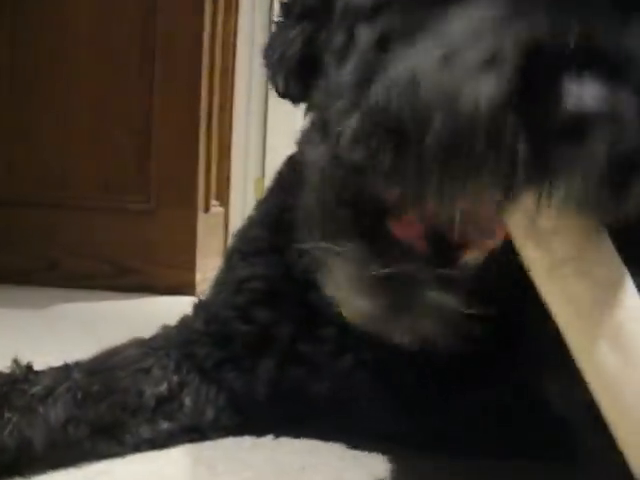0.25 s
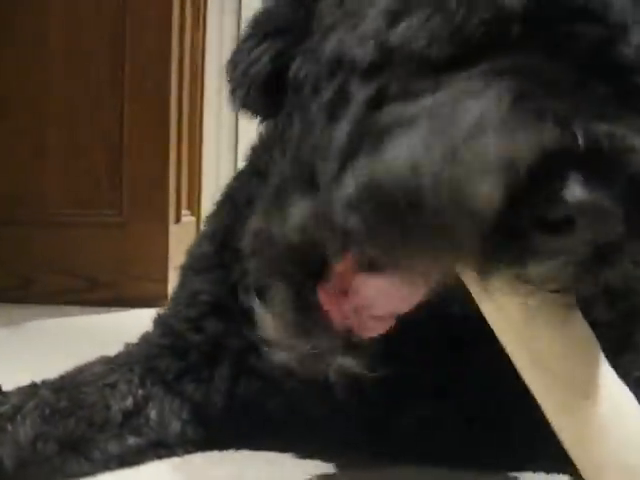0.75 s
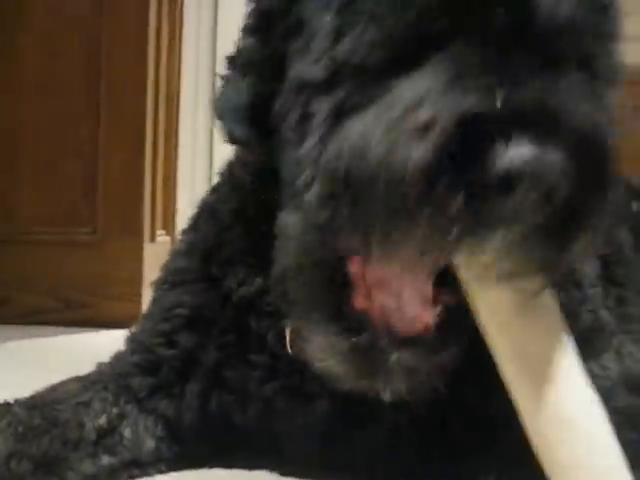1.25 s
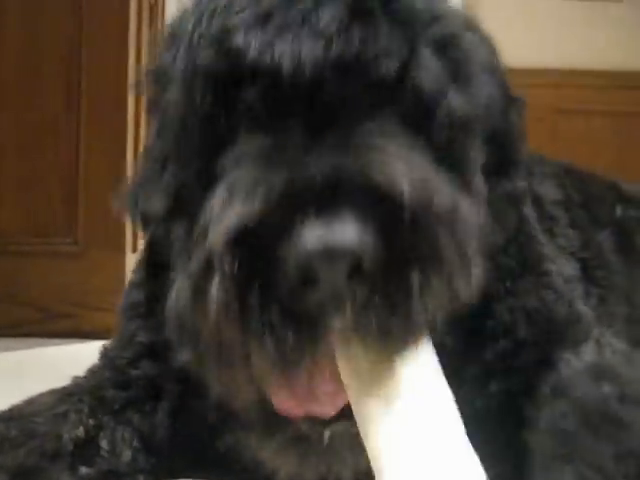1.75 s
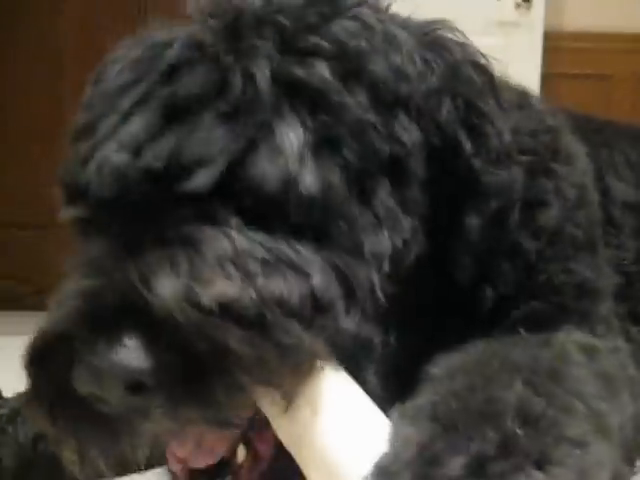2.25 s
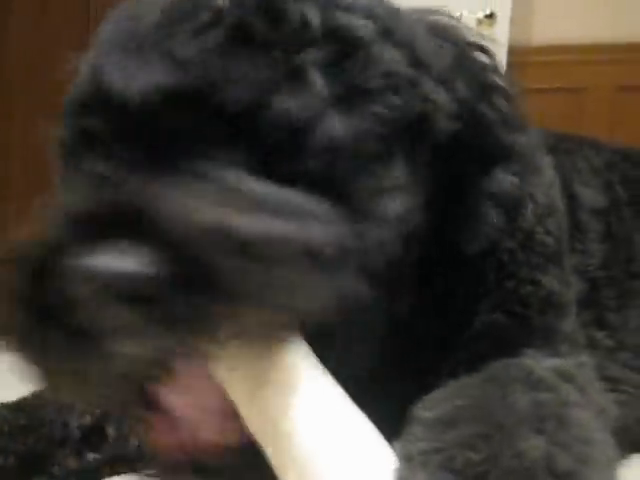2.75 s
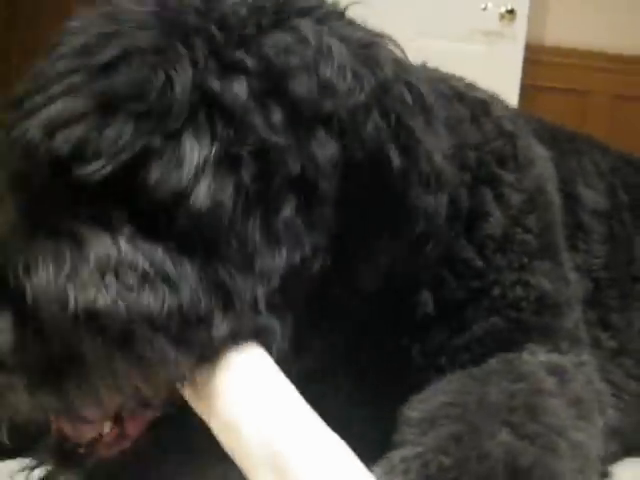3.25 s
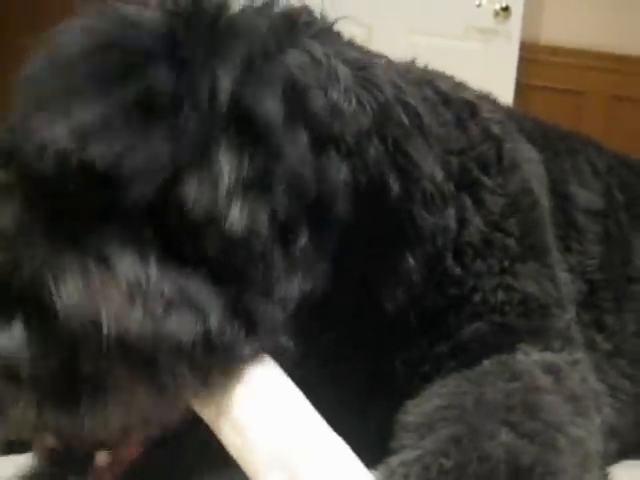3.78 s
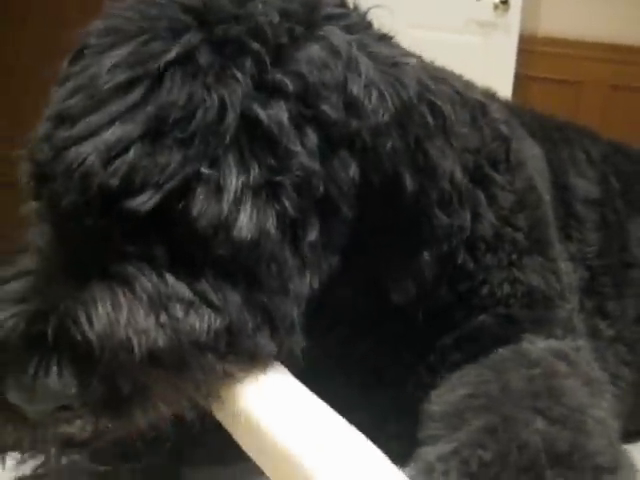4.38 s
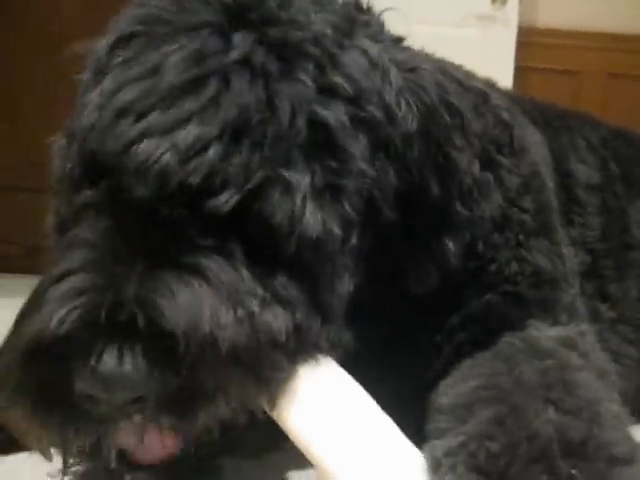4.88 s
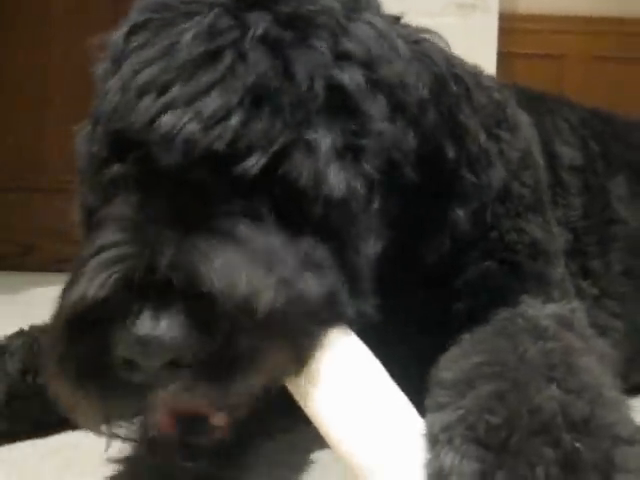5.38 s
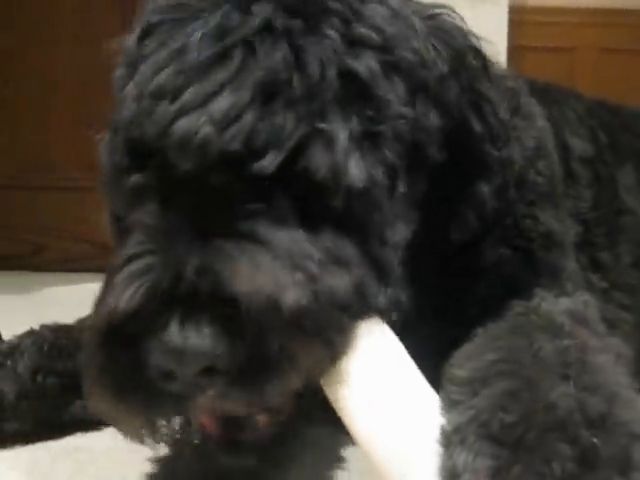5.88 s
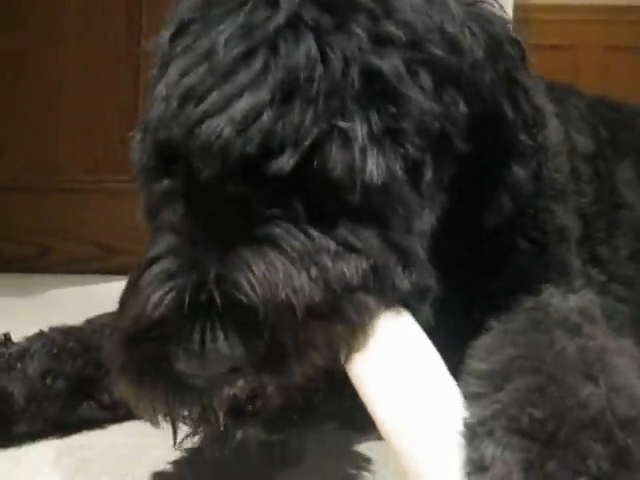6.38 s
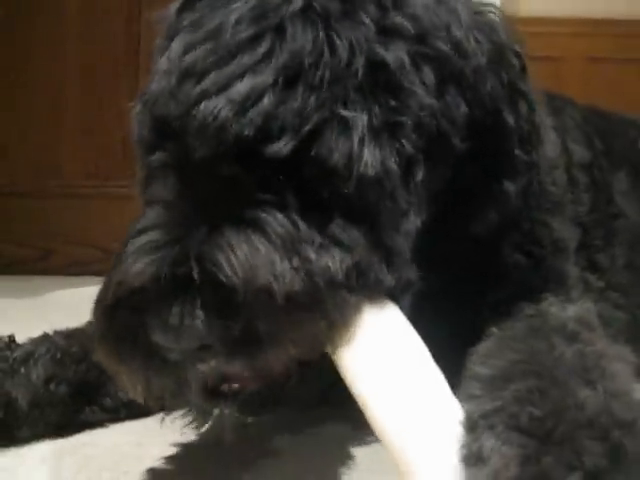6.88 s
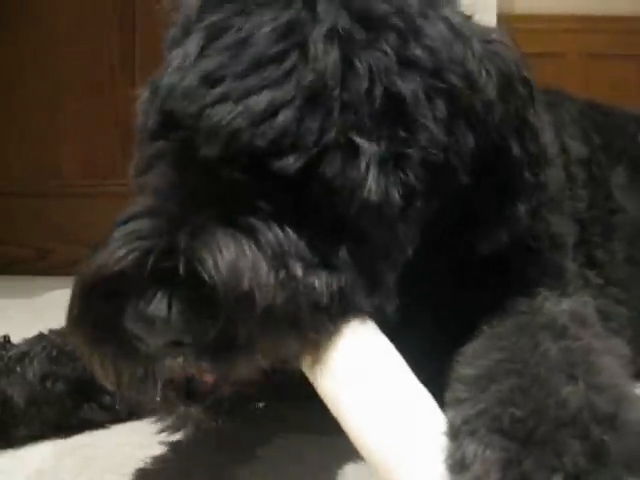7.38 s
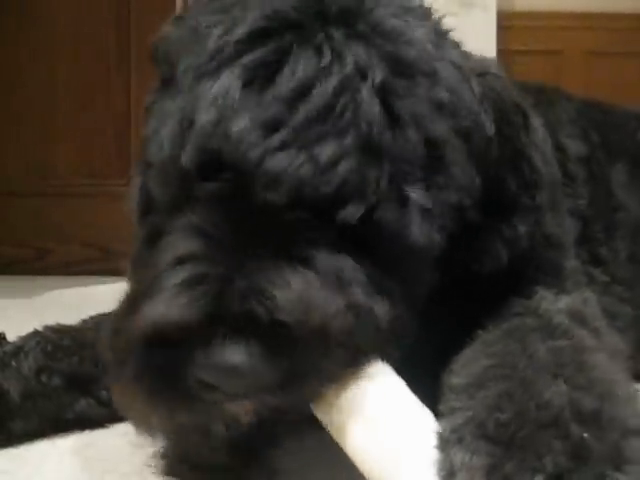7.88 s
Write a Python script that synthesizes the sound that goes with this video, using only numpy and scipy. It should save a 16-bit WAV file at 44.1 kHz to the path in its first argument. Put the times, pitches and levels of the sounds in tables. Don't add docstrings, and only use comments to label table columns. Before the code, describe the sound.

Close, dull-sounding tooth cracks and rasping bites on a hollow bone, loudest around two seconds, then sparser clicks, knocks and floor thumps.

```python
import sys
import numpy as np
from scipy import signal
from scipy.fft import rfft, irfft, next_fast_len
from scipy.io import wavfile
from scipy.ndimage import map_coordinates

SR = 44100
rng = np.random.default_rng(int(sys.argv[2]) if len(sys.argv) > 2 else 0)


def ratio(d):
    e = np.asarray(d, float) / 20
    return 10 ** e


def output_pcm(signal):
    pcm = np.clip(np.atleast_2d(signal).T, -1, 1) * 32767
    wavfile.write(sys.argv[1], SR, np.round(pcm).astype(np.int16))


N = 358974


def unit(x):
    return x / np.sqrt(np.mean(x ** 2) + 1e-20)


def wobble(rate):
    knots = rng.standard_normal(int(N * rate / SR) + 4)
    return map_coordinates(knots, [np.arange(N) * rate / SR])


def coloured(x, spectrum):
    m = next_fast_len(N + 8192)
    hz, db = np.transpose(spectrum)
    log_hz = np.log(np.fft.rfftfreq(m, 1 / SR) + 1)
    gain = ratio(np.interp(log_hz, np.log(hz + 1), db))
    return irfft(rfft(x, m) * gain, m)[:N]


def rung(push, hz, width_hz, order=1):
    f = np.fft.rfftfreq(push.shape[1], 1 / SR)
    damping = 1j * f * width_hz
    response = damping / (hz[:, None] ** 2 - f * f + damping)
    ring = irfft(rfft(push) * response ** order, push.shape[1])
    return ring / np.abs(ring).max(axis=1, keepdims=True)


def placed(start_s, rows):
    at = np.round(start_s * SR).astype(int)[:, None] + np.arange(rows.shape[1])
    return np.bincount(at.ravel(), rows.ravel(), N + SR)[:N]


def room():
    # hz, density_db (dB per Hz)
    hiss_spectrum = [(15, -25), (25, 9.5), (235, -3.5), (286, -7), (1410, -13.5), (2300, -16.5),
                     (4380, -20), (6500, -43)]
    # pitch_hz, level_db
    hum_tone = [(242.2, -46.5)]
    (hz, db), = hum_tone
    turns = np.cumsum(hz + 5 * wobble(25)) / SR
    hum = ratio(db - 4 + 3.5 * wobble(15)) * np.sin(2 * np.pi * turns)
    hiss = unit(coloured(rng.standard_normal(N), hiss_spectrum[:-1]))
    return ratio(-43 + 0.88 * wobble(4.7)) * hiss + hum


def swells(peak_s, build_s, release_s, db, swing_db, rest_db):
    t = np.arange(0, N + 64, 64) / SR - peak_s[:, None]
    away = np.maximum(-t / np.abs(build_s)[:, None], t / np.abs(release_s)[:, None])
    strokes = ratio(2 * (db[:, None] - swing_db * away))
    power = strokes.sum(axis=0) + ratio(2 * rest_db)
    return np.interp(np.arange(N) / 64, np.arange(len(power)), 10 * np.log10(power))


def pressure():
    # peak_s, build_s, release_s, scrape_db, depth_db
    bites = [(0, .1, 0.38, -27.5, -19), (.22, 0.39, 0.14, -31, 4), (.5, 0.24, 0.069, -39, -19),
             (.652, .04, .2, -31.5, 1), (0.865, 0.13, 0.049, -32.5, -3.5), (1.148, 0.38, 0.029, -41.5, -10),
             (1.351, 0.17, 0.098, -38, 5.5), (1.691, 0.13, 0.047, -32, 8.5), (1.865, 0.11, 0.044, -32.5, 6),
             (2.046, 0.097, 0.2, -32, -3), (2.291, 0.12, 0.27, -31.5, -20), (2.47, 0.039, 0.17, -27, -17.5),
             (2.833, 0.0077, 0.14, -36.5, -2.5), (3.137, 0.16, .2, -40, -14),
             (3.454, 0.031, 0.084, -32.5, -7), (3.879, 0.12, 0.28, -39.5, -9.5),
             (4.192, 0.043, 0.13, -41, 7), (4.433, 0.12, .02, -33, -6), (5.199, 0.26, .05, -37, 2),
             (5.442, 0.063, 0.27, -41, 1.5), (5.926, 0.1, 0.22, -37, -4), (6.792, 0.23, 0.018, -33.5, -24),
             (7.238, 0.11, 0.056, -49.5, 18.5), (7.58, 0.11, 0.089, -40.5, -3)]
    # peak_s, half_length_s, scrape_db, depth_db
    nips = [(0.295, 0.032, -40, 4), (1.705, 0.02, -36, 6), (2.12, 0.0092, -20.5, -7),
            (2.16, 0.018, -18.5, -6.5), (3.215, 0.023, -36, -11), (3.799, 0.046, -36.5, -2.5),
            (3.229, 0.036, -36, -17.5), (3.316, 0.03, -34.5, 5), (4.716, 0.013, -32, 5.5),
            (4.804, 0.03, -35.5, 5), (4.876, 0.062, -59, 17.5), (4.958, 0.061, -60, 16),
            (5.612, .05, -33, 1), (5.738, 0.041, -31.5, 6.5), (6.12, 0.11, -33.5, -2.5),
            (6.258, .07, -31.5, -5.5), (6.444, 0.34, -46, 1), (6.59, 0.25, -45, -18),
            (6.857, 0.13, -47.5, -24), (7.16, 0.14, -44.5, -15), (5.753, .012, -27, 3),
            (5.705, .012, -36, 3), (5.785, .025, -38, 6), (5.642, .005, -30, 5), (4.1635, .003, -24, -8),
            (3.252, .01, -30, 0), (3.306, .008, -28, -3), (1.635, .012, -36, 8), (7.216, .005, -30, 3),
            (0.539, .003, -26, -5), (7.674, 0.014, -34, 10), (7.974, 0.011, -36, 10),
            (8.043, 0.033, -38, 6.5), (8.091, .12, -41, 2.5)]
    # peak_s, half_length_s, rumble_db
    shuffles = [(0.557, 0.2, -40), (0.804, 0.055, -28.5), (0.973, 0.12, -37.5), (1.371, 0.068, -29),
                (1.796, 0.069, -31), (2.052, 0.067, -31.5), (2.31, 0.09, -34), (3.19, 0.26, -36),
                (4.776, 0.13, -37.5), (5.2, 0.1, -32.5), (5.435, 0.11, -48.5), (5.773, 0.018, -25.5),
                (5.957, 0.36, -34.5), (6.135, 0.07, -38), (6.64, 0.32, -43.5), (7.275, 0.046, -32),
                (7.58, 0.088, -39.5), (7.705, 0.041, -33.5), (7.985, 0.044, -34)]
    swing_db, deep_swings = 14.5, 1.2
    floor_share_db = -4

    even_nips = [(s, half, half, db, depth) for s, half, db, depth in nips]
    s, build, release, db, depth_db = np.transpose(bites + even_nips)
    fine_db = swells(s, build, release, db, swing_db, rest_db=-49)
    coarse_db = swells(s, build, release, db + depth_db, deep_swings * swing_db, rest_db=-55)
    s, half, db = np.transpose(shuffles)
    shuffle_db = swells(s, half, half, db, swing_db, rest_db=-53)
    rumble_power = ratio(2 * shuffle_db) + ratio(2 * (coarse_db + floor_share_db))
    return fine_db, coarse_db, 10 * np.log10(rumble_power)


def grit(share, spread_db, smooth):
    size = ratio(spread_db * np.minimum(rng.exponential(size=N), 4))
    happens = rng.random(N) < share * ratio(6 * wobble(120))
    slips = happens * rng.standard_normal(N) * size
    return unit(slips) + smooth * rng.standard_normal(N)


def crumbs(count, centre_hz, octaves, life, spread_db):
    at = rng.integers(N, size=count)
    hz = centre_hz[at, None] * 2 ** (octaves * rng.standard_normal((count, 1)))
    cycles = hz * np.arange(512) / SR
    envelope = np.exp(-cycles / life) * (1 - np.exp(-cycles / .5))
    rows = np.sin(2 * np.pi * cycles) * envelope
    size_db = spread_db * np.minimum(rng.exponential(size=(count, 1)), 3)
    return unit(placed(at / SR, rows * ratio(size_db)))


def grinding():
    # hz, density_db (dB per Hz)
    fine_spectrum = [(1500, -4.5), (2500, -4), (3300, -2), (4500, -2.5), (7000, -11)]
    # hz, density_db (dB per Hz)
    rumble_spectrum = [(20, -18.5), (80, -3), (150, -1), (300, -5.5), (600, -14), (1500, -51.5),
                       (7000, -84)]
    # time_s, resonance_hz
    mouth_path = [(0, 1650), (0.549, 1352), (.7, 1680), (1.301, 1412), (1.751, 1826), (2.298, 2035),
                  (2.901, 1216), (3.451, 1140), (3.88, 1410), (4.298, 965), (4.749, 1127), (4.9, 740),
                  (5.602, 1116), (5.801, 876), (6.3, 1225), (6.898, 1345), (7.301, 779), (8.14, 1160)]

    fine_db, coarse_db, rumble_db = pressure()
    mouth_hz = np.interp(np.arange(N) / SR, *np.transpose(mouth_path))
    flutter = wobble(70) / (1 + 40 * ratio(fine_db))

    slips = grit(.04, spread_db=1.8, smooth=.5 + 14 * ratio(fine_db))
    fine = unit(coloured(slips, fine_spectrum))
    fine = fine + .5 * crumbs(count=2500, centre_hz=0 * mouth_hz + 3500, octaves=0.42, life=0.98, spread_db=-0.5)
    fine = unit(ratio(2.42 * flutter) * fine)

    rubbing = crumbs(count=7000, centre_hz=mouth_hz, octaves=0.592, life=0.87, spread_db=0.0)
    ringing = crumbs(count=2500, centre_hz=mouth_hz, octaves=0.28, life=4, spread_db=2.5)
    coarse = unit(ratio(4.1 * flutter + 0.5 * wobble(30)) * (1.4 * rubbing + ringing))

    rumble = unit(ratio(3.1 * wobble(30)) * coloured(rng.standard_normal(N), rumble_spectrum))
    return ratio(fine_db - 0.75) * fine + ratio(coarse_db - 3.43) * coarse + ratio(rumble_db) * rumble


def contacts():
    # start_s, tooth_peak_db, tooth_ring_hz, bone_peak_db, bone_ring_hz
    crack_events = [(0.5405, 1, 3430, -6, 1040), (0.6139, -11.5, 2920, -12, 1980),
                    (1.6841, -8.5, 3340, -13, 1680), (2.1168, -10, 3180, -24, 1710),
                    (2.1419, 1, 3170, -7.5, 2060), (2.147, -5.5, 3400, -16.5, 2070),
                    (2.1558, 0.5, 3420, -11, 2070), (2.2168, -5.5, 3920, -13, 1870),
                    (2.3011, 3, 3680, -15, 2480), (2.4708, -9, 3600, -21.5, 757),
                    (2.475, 5.5, 3440, -10, 1460), (2.5108, 2, 3210, -11, 2180),
                    (3.128, -13, 4000, -14.5, 1165), (3.3054, -19, 3770, -15.5, 1000),
                    (3.3123, -10, 3600, -19, 444), (3.5995, -7, 3090, -11, 1640),
                    (3.8586, -5.5, 3050, -8.5, 1544), (4.165, -2, 3090, -6, 1515),
                    (4.8395, -18.5, 2900, -12.5, 650), (5.6446, -17.5, 4320, -11.5, 830),
                    (5.735, -12, 3450, -9, 1340), (6.042, -7, 2860, -11.5, 1520),
                    (7.1207, -14, 3130, -16, 1760), (7.2191, -6.5, 2500, -6, 755)]
    # start_s, peak_db, tooth_ring_hz
    tick_events = [(0.7007, -18, 4000), (0.745, -14.5, 4850), (0.7829, -13.5, 5130), (0.832, -15.5, 5300),
                   (1.526, -14.5, 5100), (1.5822, -22, 4580), (1.78, -11, 2600), (1.8645, -14, 2890),
                   (1.9837, -19, 2870), (2.037, -19, 4550), (2.1995, -13, 4800), (2.254, -14, 3100),
                   (2.311, -2, 3800), (2.348, -13, 3120), (2.4283, -13, 2950), (2.4358, -10.5, 3650),
                   (2.784, -17.5, 4500), (2.8462, -13, 4030), (3.0453, -19, 4120), (3.2489, -9, 3140),
                   (4.367, -21, 4870), (4.689, -21, 4900), (4.7136, -19, 3100), (5.1864, -20, 2930),
                   (5.6056, -19.5, 4280), (6.0966, -17, 3050), (6.246, -13.5, 3370), (6.4763, -16, 3230),
                   (6.584, -17.5, 5460), (6.719, -16, 4860)]
    # start_s, peak_db, tooth_ring_hz
    nibble_events = [(0.713, -23, 4930), (0.8658, -25, 3150), (1.282, -21.5, 4170), (1.334, -21, 2830),
                     (2.008, -15, 3100), (2.439, -21, 3750), (3.102, -19.5, 3070), (3.282, -28, 3530),
                     (3.4744, -22, 4260), (3.609, -19, 4400), (3.874, -24.5, 2900), (4.35, -18, 3360),
                     (5.4187, -23, 3030), (5.618, -20.5, 4300), (5.847, -25, 4650), (6.2162, -21, 4350),
                     (6.271, -20, 3500), (6.277, -17.5, 3550), (6.327, -20, 3850), (6.776, -23.5, 4020),
                     (6.7823, -22, 3630), (6.7923, -17, 3250), (6.9761, -23, 5070), (7.052, -22, 3300),
                     (7.082, -26, 4700), (7.34, -32, 3850), (7.113, -25, 3000), (7.318, -28, 3720),
                     (7.435, -30.5, 3460), (7.48, -23, 3460), (7.5035, -23.5, 2780), (7.542, -23, 2530),
                     (4.222, -23, 3270),
                     (0.1806, -16, 3700), (0.2117, -14.5, 3100), (0.296, -26, 3920), (0.4212, -24, 4180),
                   (0.6539, -22, 2520), (1.1195, -27, 4200), (1.2023, -26, 5030), (1.4097, -30, 2780),
                   (1.615, -31, 4760), (1.6948, -23, 2890), (1.717, -30, 2860), (1.8242, -23, 2520),
                   (1.9456, -35, 4290), (2.2848, -21, 3940), (2.2901, -22, 4130), (2.3793, -19, 3400),
                   (2.432, -15, 2910), (2.448, -30, 3120), (2.4652, -22.5, 3140), (2.6476, -27, 4050),
                   (3.0082, -33.5, 3510), (3.063, -24, 4440), (3.1423, -26, 3520), (3.3463, -36, 4600),
                   (3.381, -27.5, 4250), (3.662, -36, 4100), (3.73, -31, 3390), (3.7738, -32, 3400),
                   (3.9976, -30.5, 3940), (4.0183, -29, 4260), (4.2685, -37, 4800), (4.4215, -19.5, 5430),
                   (4.4296, -19, 4720), (4.5, -27, 3750), (4.6171, -29.5, 4200), (4.9493, -37, 3380),
                   (5.0027, -32.5, 4690), (5.0768, -23, 4550), (5.111, -28, 3700), (5.1262, -27.5, 3480),
                   (5.156, -25, 3040), (5.1924, -16.5, 2860), (5.4743, -28.5, 2820), (5.6005, -17, 3730),
                   (5.7035, -29, 3380), (5.874, -35, 3920), (5.898, -26, 3510), (6.0068, -26, 4690),
                   (6.083, -23, 4670), (6.5003, -24, 3360), (6.862, -29, 4310), (6.9432, -28, 4600),
                   (7.4568, -33.5, 4720), (7.6333, -32.5, 3120), (7.7334, -31, 4600), (7.7831, -27, 4600),
                   (7.916, -28, 4350), (7.9586, -30, 3080)]
    # start_s, peak_db, bone_ring_hz
    knock_events = [(0.2875, -19, 1600), (0.557, -21.5, 1070), (1.3682, -14.5, 1420), (1.3826, -20.5, 1510),
                    (1.6276, -10.5, 1430), (1.708, -21, 2050), (1.762, -22, 1690), (1.842, -19, 2000),
                    (1.8707, -16, 1830), (2.0704, -17.5, 960), (2.3194, -28, 670), (2.8353, -11, 1950),
                    (3.1968, -18.5, 790), (3.251, -16, 410), (3.789, -34, 660), (4.3986, -15, 626),
                    (4.779, -15.5, 1190), (5.036, -25, 1490), (5.2381, -22.5, 1600), (5.6676, -8, 1240),
                    (5.751, -9, 620), (7.115, -23, 1820), (7.265, -25, 940), (7.665, -10.5, 740),
                    (7.9856, -20.5, 780), (0.541, -10.5, 2040), (2.3023, -7.5, 1900), (3.858, -12, 1080),
                    (4.1665, -9, 610), (6.4775, -24, 1330), (6.4785, -24, 565), (6.72, -23, 1930),
                    (6.76, -29, 1850), (7.216, -19, 1200), (7.12, -22.5, 1000), (8.028, -17.5, 1810),
                    (8.0325, -13.5, 1720),
                    (0.1885, -20.5, 1500), (0.1998, -19, 1430), (0.2037, -21, 1320), (0.2307, -27, 1640),
                  (0.2759, -23.5, 1540), (0.7003, -23.5, 1100), (0.7831, -27.5, 1400), (0.8801, -27, 965),
                  (1.582, -28, 1680), (1.658, -24, 990), (1.6717, -30, 1680), (1.7471, -29, 1510),
                  (1.8832, -21, 1600), (2.4537, -36, 1030), (2.4753, -7, 810), (3.1677, -31, 520),
                  (4.8142, -30, 1270), (5.0612, -29, 2060), (5.0784, -27.5, 830), (5.1501, -30, 1320),
                  (5.1596, -27, 735), (5.1991, -29, 516), (5.2172, -28, 780), (6.4428, -35, 820),
                  (6.5283, -41.5, 1310), (7.2273, -28.5, 730), (7.6992, -31, 524)]
    tooth_hz, bone_hz, scatter_oct = 3600, 1350, 0.68
    bone_under_db, tooth_under_db = 16.5, 14

    def near(hz, like):
        return hz * 2 ** (scatter_oct * rng.uniform(-0.48, 1, len(like)))

    s, db, hz = np.transpose(tick_events)
    ticks = [s, db, hz, db - bone_under_db, near(bone_hz, s)]
    s, db, hz = np.transpose(knock_events)
    knocks = [s, db - tooth_under_db, near(tooth_hz, s), db, hz]
    s, db, hz = np.transpose(nibble_events)
    nibbles = [s, db, hz, db - bone_under_db + 7, near(bone_hz, s)]
    return np.hstack([np.transpose(crack_events), ticks, knocks, nibbles])


def splinters(count, rise_s, t60_s):
    t = np.arange(1536) / SR
    decay = ratio(-60 * t / t60_s) + 2 * ratio(-60 * t / 0.0039)
    ragged = rng.standard_normal((count, len(t))) * (1 - np.exp(-t / rise_s)) * decay
    clean_slip = 12.4 * (np.arange(len(t)) == 12)
    return ragged + clean_slip


def cracks():
    s, tooth_db, tooth_hz, bone_db, bone_hz = contacts()
    t60_s = 0.018 * ratio(0.05 * (np.maximum(tooth_db, bone_db)[:, None] + 22.5))
    push = splinters(len(s), rise_s=0.0003, t60_s=t60_s)

    snap = rung(push, tooth_hz, width_hz=3200, order=2)
    tooth = rung(push, tooth_hz, width_hz=1000, order=2) + .8 * snap

    body = ratio(-12.5) * rung(push, 0 * s + 620, width_hz=440)
    broad = rung(push, 0 * s + 1200, width_hz=1700, order=2)
    bone = rung(push, bone_hz, width_hz=0.39 * bone_hz[:, None], order=2) + 1.07 * broad + body
    return placed(s, ratio(tooth_db[:, None] - 5.5) * tooth + ratio(bone_db[:, None] - 3.5) * bone)


def thumps():
    # start_s, peak_db, pitch_hz
    thump_events = [(3.036, -25.5, 148), (0.361, -19, 252), (0.625, -26, 200), (0.772, -21.5, 130),
                    (0.81, -19.5, 140), (1.875, -23.5, 90), (0.642, -19.5, 208), (0.795, -17.5, 100.6),
                    (0.954, -24, 132), (1.626, -7.5, 294), (1.762, -18.5, 184), (1.782, -8, 254),
                    (2.043, -15, 141), (2.053, -18.5, 99), (2.472, -17, 442), (3.312, -15, 224),
                    (4.165, -18, 368), (4.4, -21, 247), (4.709, -24, 150), (4.787, -21.5, 204),
                    (4.845, -26.5, 151), (5.077, -25.5, 109), (5.176, -22.5, 159), (5.594, -26, 251),
                    (5.647, -12, 326), (5.668, -9.5, 269), (5.734, -14, 234), (5.754, -22, 140),
                    (6.114, -27, 161), (6.584, -25.5, 223), (7.222, -13.5, 164.5), (7.265, -14, 187),
                    (7.665, -18.5, 284), (7.977, -18.5, 164)]
    s, db, hz = np.transpose(thump_events)
    cycles = hz[:, None] * np.arange(4096) / SR
    envelope = (1 - np.exp(-cycles / 0.15)) * ratio(-60 * cycles / 7)
    return placed(s, ratio(db[:, None] + 5.5) * -np.sin(2 * np.pi * cycles) * envelope)


def walls(x):
    t = np.arange(SR // 5) / SR
    tail = rng.standard_normal(len(t)) * ratio(-60 * t / 0.33)
    delayed = np.pad(x, (450, 0))
    return signal.fftconvolve(delayed, tail / np.linalg.norm(tail))[:N]


def jolts():
    # start_s, size_db
    jolt_events = [
        (0.542, -24),
        (2.145, -21),
        (2.302, -21),
        (2.56, -30),
        (3.13, -47),
        (3.859, -33),
        (4.166, -27.5),
    ]
    drop_s, rebound_s, rebound = 0.0402, 0.13, 0.35
    s, db = np.transpose(jolt_events)
    t = np.arange(SR // 2) / SR
    swing = rebound * np.exp(-t / rebound_s) - np.exp(-t / drop_s)
    return placed(s, ratio(db)[:, None] * swing * (1 - np.exp(-t / .002)))


def squeaks():
    # start_s, length_s, start_hz, end_hz, level_db
    squeak_events = [
        (3.483, .112, 2200, 2170, -46.5),
        (6.41, .03, 980, 900, -41),
        (6.415, .035, 640, 700, -41),
    ]
    t = np.arange(N) / SR
    out = np.zeros(N)
    for s, length, hz0, hz1, db in squeak_events:
        u = np.clip((t - s) / length, 0, 1)
        phase = 2 * np.pi * np.cumsum(hz0 + (hz1 - hz0) * u) / SR
        tone = np.sin(phase) + .3 * np.sin(3 / 2 * phase)
        out += ratio(db + 2.5 * wobble(60)) * np.sin(np.pi * u ** .6) ** .7 * tone
    return out


def scene():
    hits = cracks() + thumps()
    mix = hits + ratio(-18.5) * walls(hits) + grinding() + squeaks() + room()
    return np.tile(mix, (2, 1))


def top_cut(x):
    return signal.sosfilt(signal.butter(12, 16520, fs=SR, output="sos"), x)


def record(dry):
    # hz, gain_db
    mic_response = [(20, -6), (4600, 3), (5500, -2), (6200, -8), (6800, -22), (7400, -51), (8200, -91),
                    (20000, -120)]
    x = coloured(dry[0], mic_response)
    t = np.arange(SR) / SR
    over = np.clip(np.abs(x) - .5, 0, .5)
    duck_shape = (1 - np.exp(-t / 0.0036)) * np.exp(-t / 0.094)
    duck_db = -.75 * signal.fftconvolve(over, duck_shape)[:N]
    ducked = ratio(np.clip(duck_db, -16, 0)) * x
    clipped = np.clip(ducked + jolts() - .0024, -.95, .95)
    top_hz = 16200
    mix = np.tile(coloured(clipped, [(top_hz, 0), (top_hz + 700, -60)]), (2, 1))
    return top_cut(mix)


dry = scene()
out = record(dry)
output_pcm(out)
```